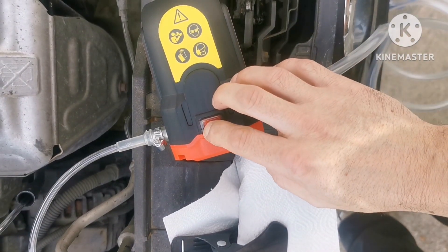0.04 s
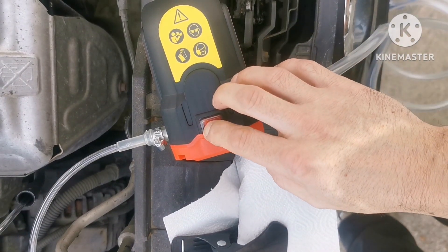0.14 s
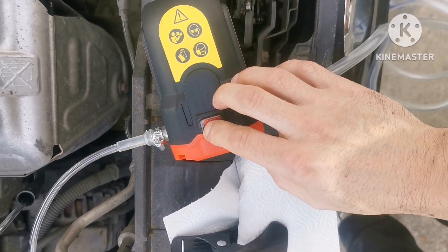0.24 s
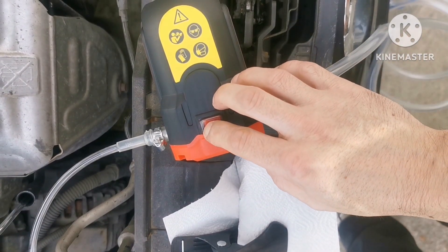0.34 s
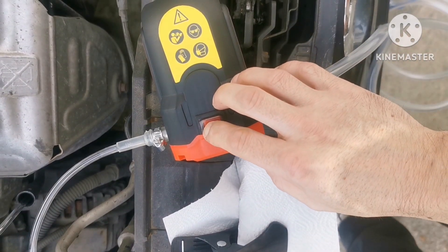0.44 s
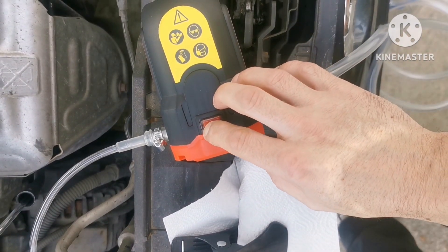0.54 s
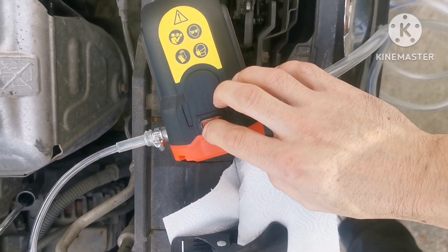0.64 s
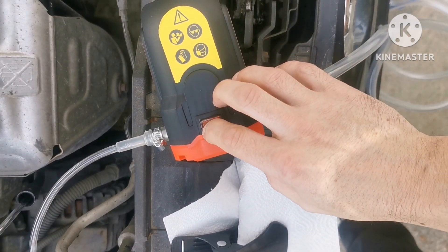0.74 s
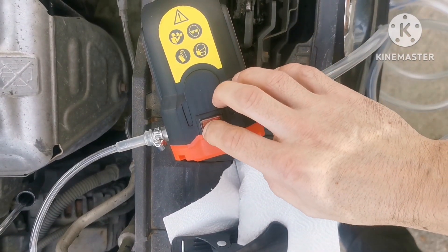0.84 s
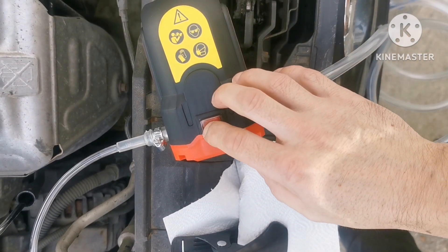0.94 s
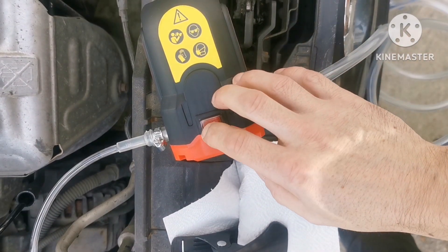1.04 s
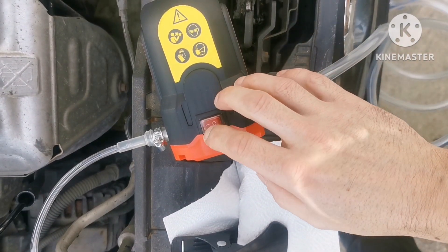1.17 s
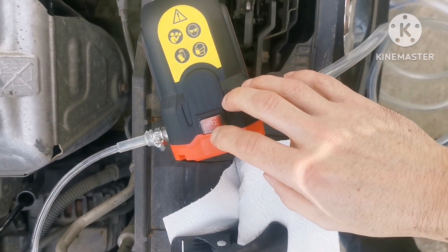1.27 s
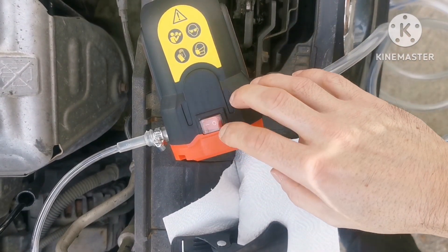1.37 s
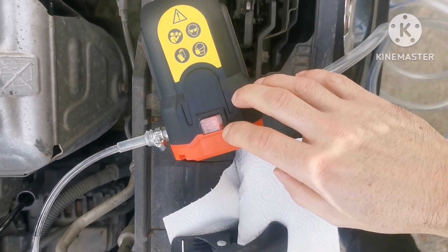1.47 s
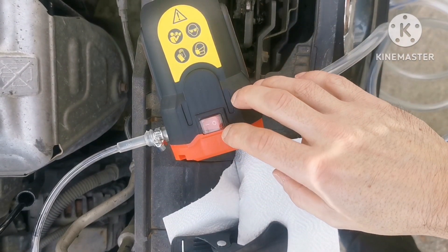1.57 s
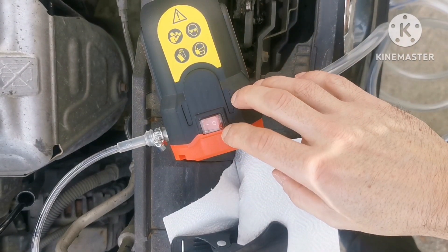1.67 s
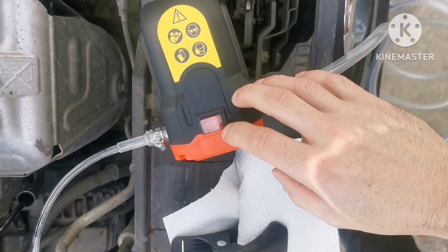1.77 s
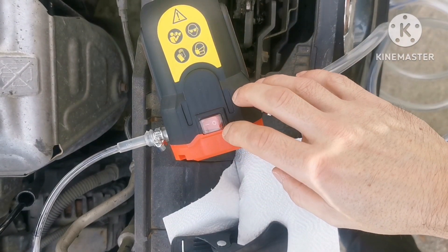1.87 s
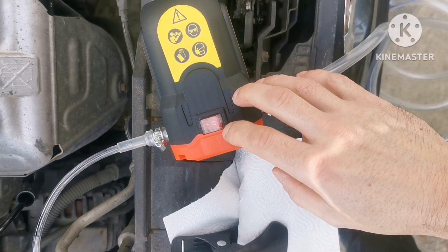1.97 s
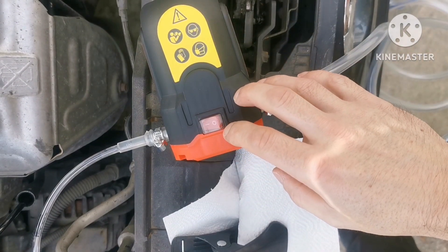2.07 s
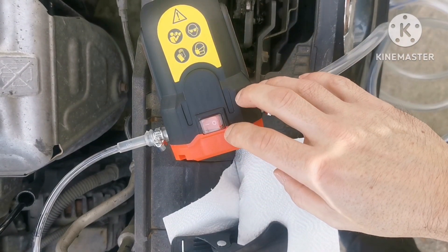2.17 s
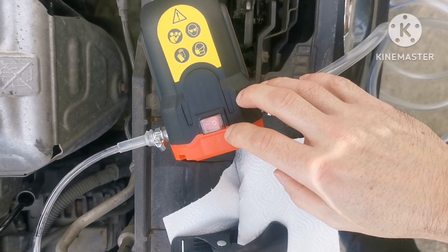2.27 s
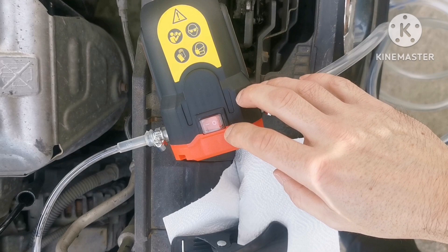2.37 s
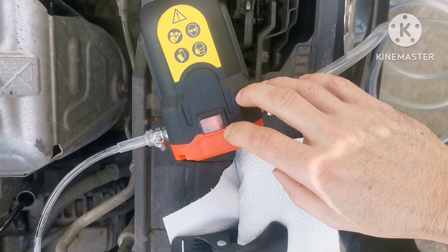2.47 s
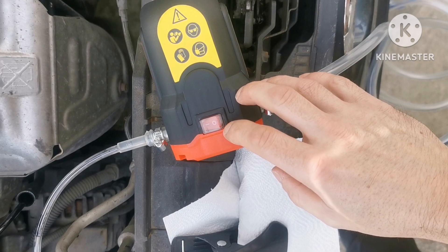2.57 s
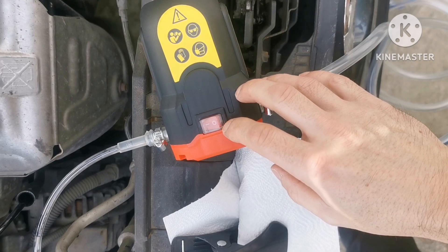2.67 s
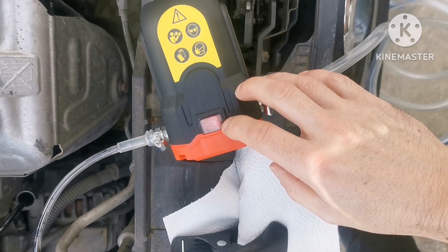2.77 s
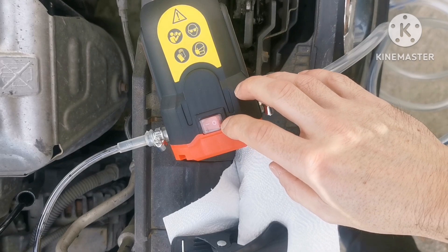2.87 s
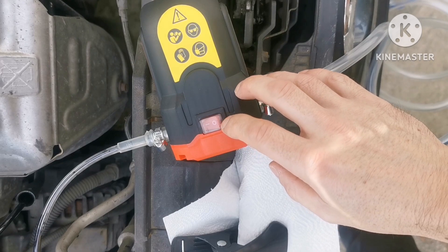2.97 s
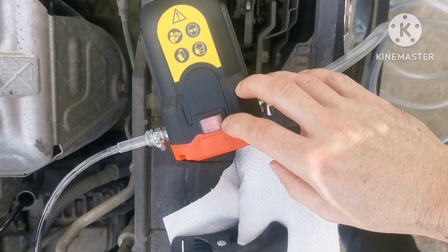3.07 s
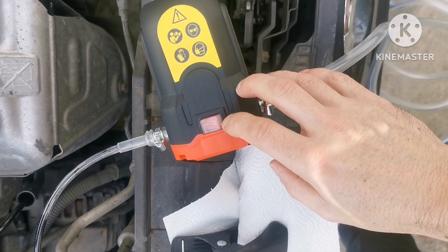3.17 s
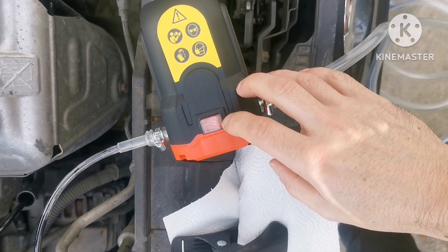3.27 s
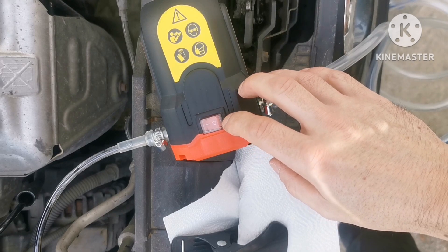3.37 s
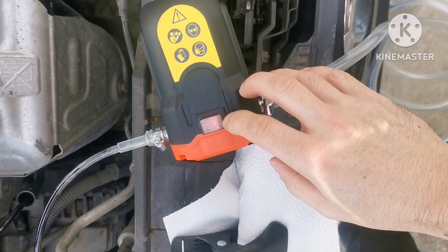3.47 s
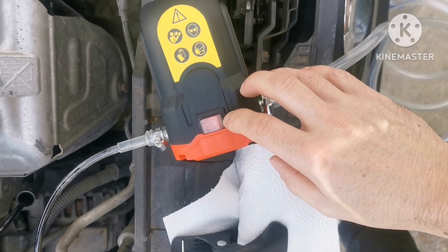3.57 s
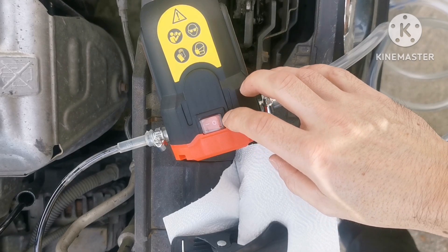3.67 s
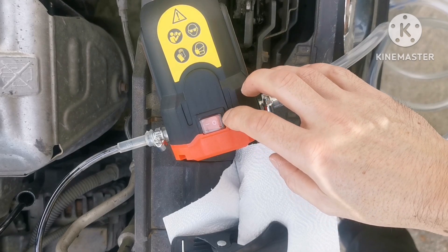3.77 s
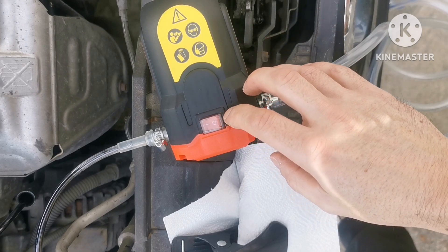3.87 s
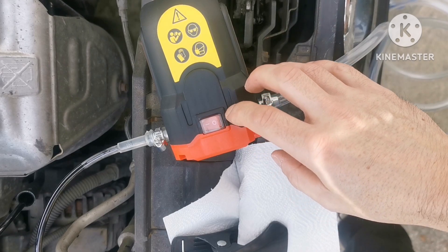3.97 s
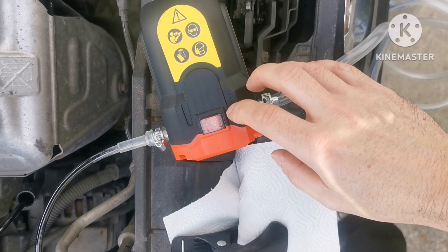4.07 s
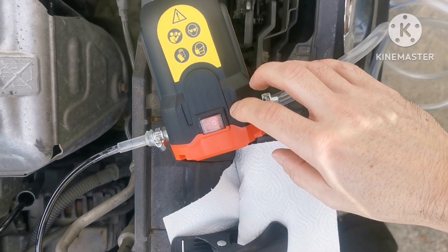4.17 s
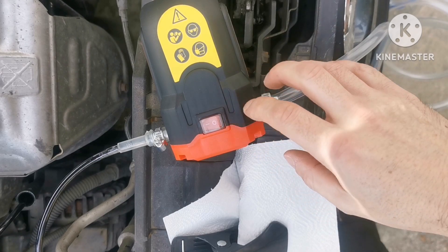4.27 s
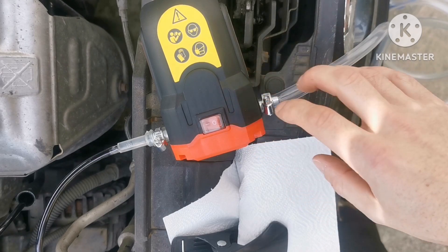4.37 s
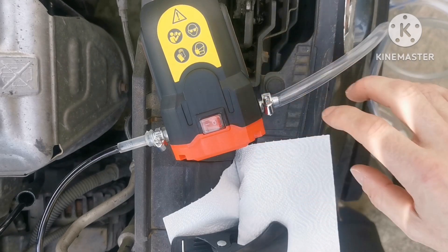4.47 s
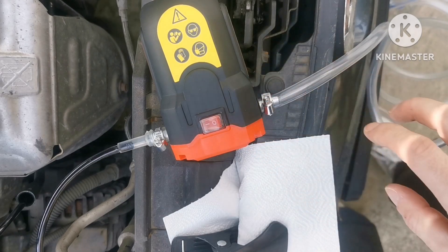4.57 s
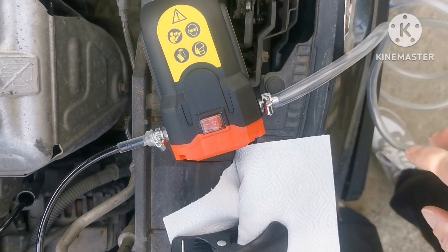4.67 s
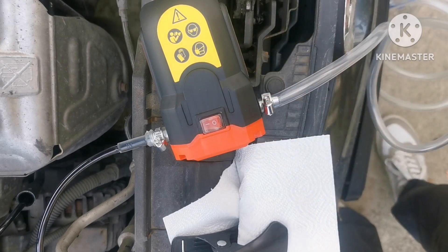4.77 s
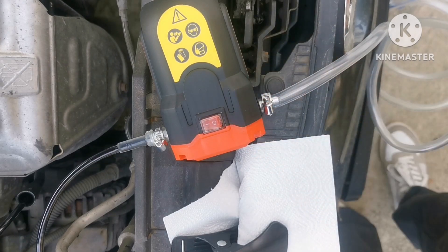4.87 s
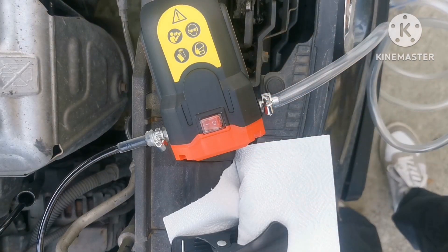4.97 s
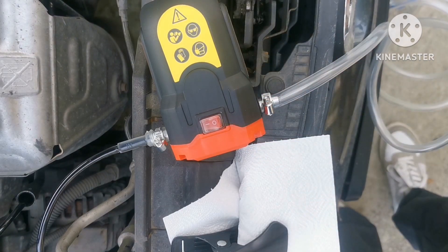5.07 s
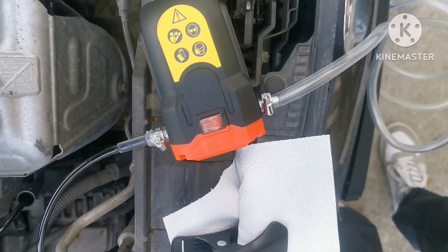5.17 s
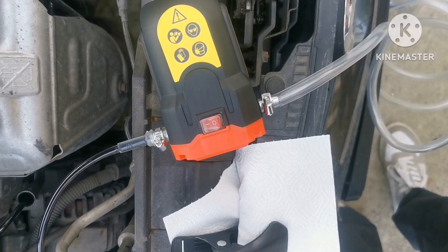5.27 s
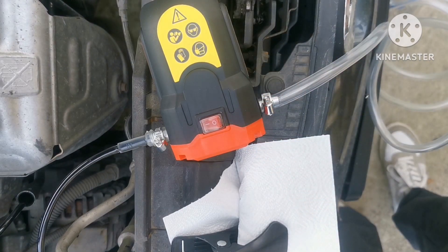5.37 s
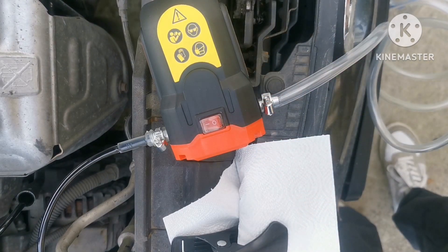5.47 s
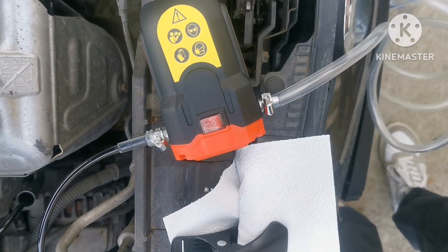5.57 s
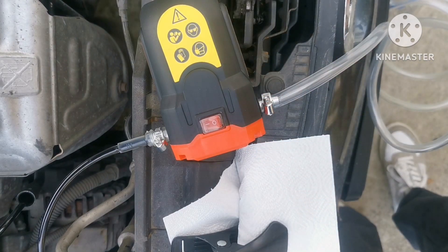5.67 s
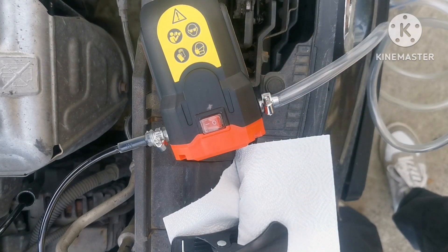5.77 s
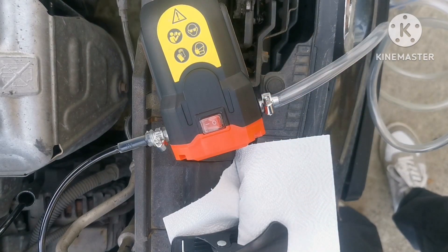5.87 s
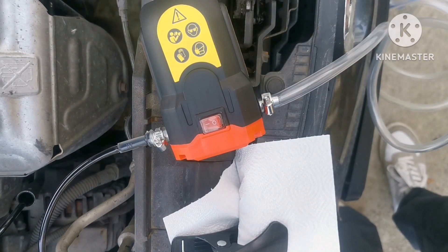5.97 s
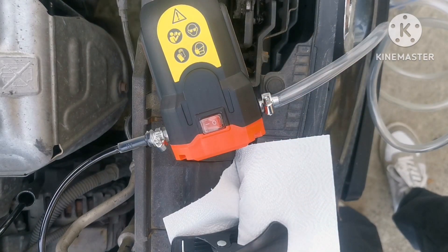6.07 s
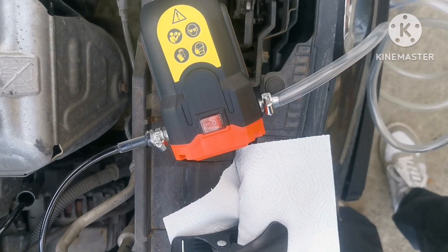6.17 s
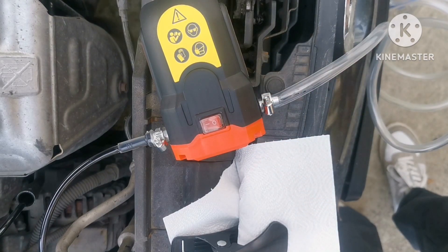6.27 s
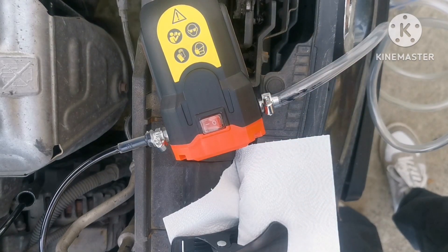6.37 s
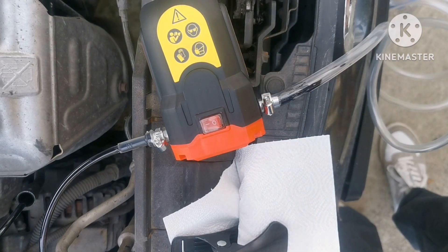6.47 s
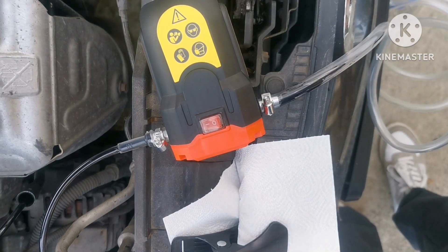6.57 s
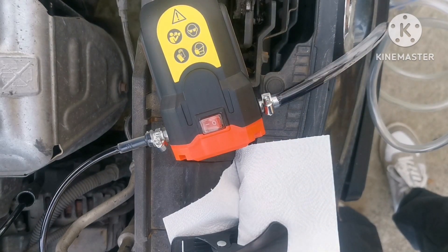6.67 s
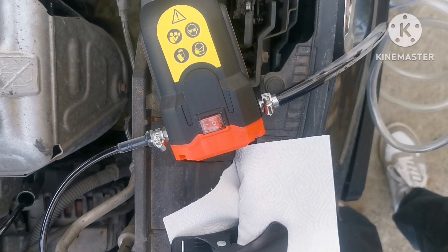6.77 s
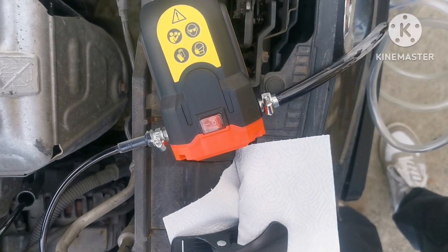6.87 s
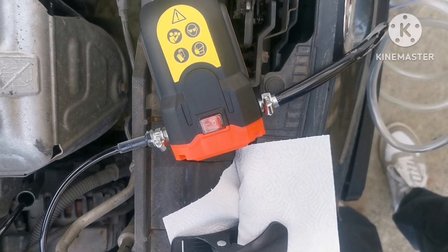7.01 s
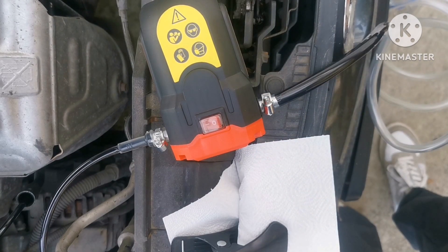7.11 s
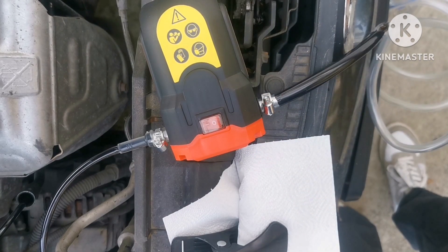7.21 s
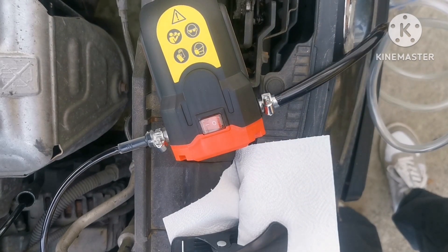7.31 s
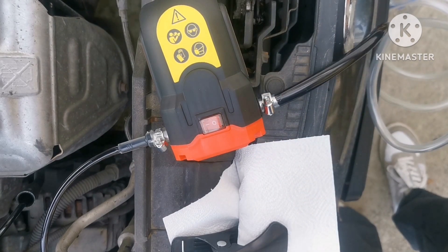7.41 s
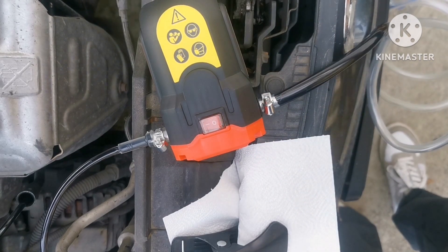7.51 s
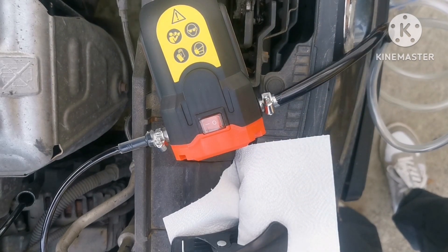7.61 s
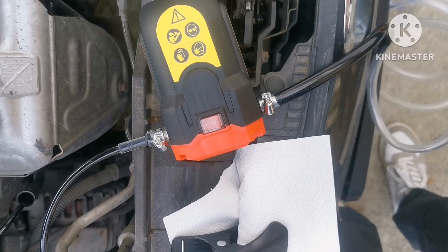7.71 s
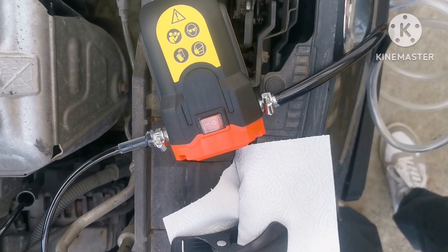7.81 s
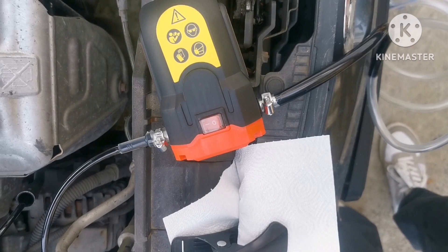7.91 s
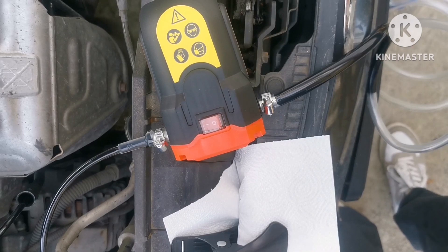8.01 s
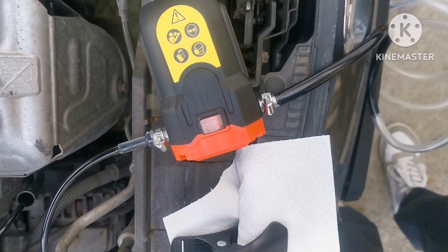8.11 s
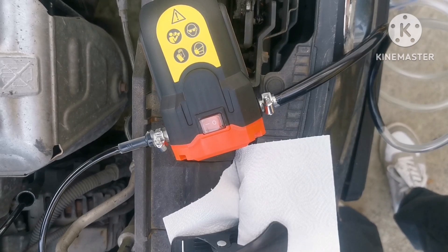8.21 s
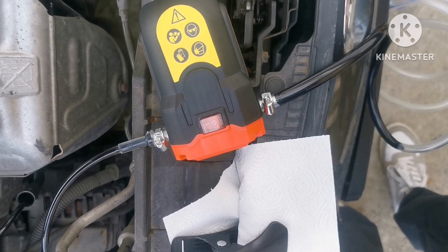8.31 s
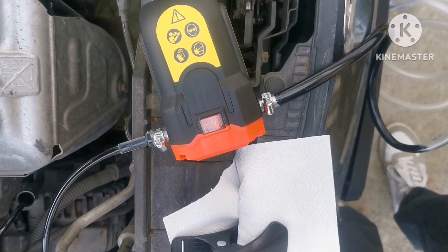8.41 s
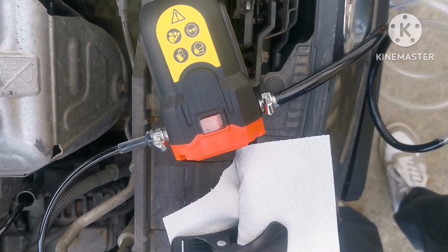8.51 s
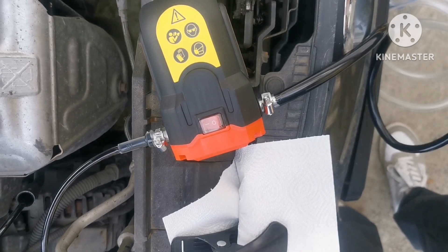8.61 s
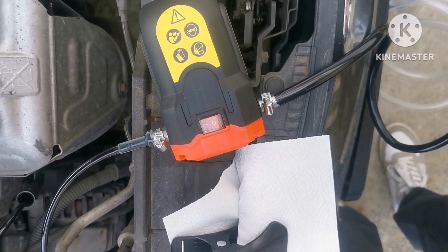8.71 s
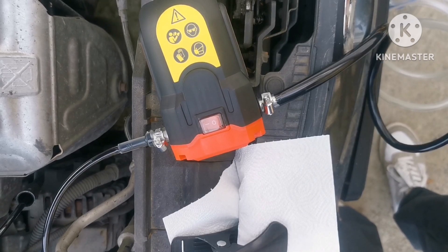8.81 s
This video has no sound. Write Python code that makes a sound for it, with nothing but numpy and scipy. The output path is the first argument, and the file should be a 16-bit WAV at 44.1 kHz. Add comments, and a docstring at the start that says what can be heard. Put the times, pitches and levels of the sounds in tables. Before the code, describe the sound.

A switch snaps, a small geared electric pump whirs up with a high whine and rattle, then oil drags it into a lower pulsing drone.

```python
"""A switch snaps, a gear whine and a rattle start up, and later both are drawn down into a pulsing, oil-laden drone.
A small electric pump lying on a car engine draws oil through a hose; a phone is held above it.
A 12-tooth motor pinion drives a 50-tooth crank wheel: partials locked to the crank angle make hum and whine,
while tooth flaws and noise, coloured by the plastic case, make the rattle. On air the gears run fast;
oil slows the motor and the teeth sing in one burst per crank turn. Quiet garage air and low booms lie beneath."""
import sys
import numpy as np
from scipy import signal
from scipy.fft import rfft, irfft, next_fast_len
from scipy.io import wavfile
from scipy.ndimage import uniform_filter1d, map_coordinates

SR = 44100
rng = np.random.default_rng(int(sys.argv[2]) if len(sys.argv) > 2 else 0)


def waveform_to_disk(signal):
    """Save audio, clipped to [-1, 1], as 16-bit WAV at the path in sys.argv[1]."""
    frames = np.transpose(np.atleast_2d(signal))
    scaled = np.clip(frames, -1, 1) * 32767
    samples = np.round(scaled).astype(np.int16)
    wavfile.write(sys.argv[1], SR, samples)


N = 390285
TIME = np.arange(N) / SR
WHEEL_TEETH, PINION_TEETH = 50, 12
FREE_HZ = 51.36  # crank turns per second of the unloaded motor
OIL_ARRIVES_S = 6.1
SEATING_S = 1.066, 0.022  # moment the teeth seat and time they take, in seconds

# movements of the rocker switch, pressed and then snapping over: start_s, level_db [dB, peak of the ring]
SWITCH_MOVES = [(.694, -48), (.744, -20.5)]
# the oil's uneven drag on the motor: time_s, speed_loss_hz [crank turns per second]
OIL_DRAG = [(6.05, 0.0), (6.15, 0.93), (6.36, 5.3), (6.5, 6.35), (6.56, 5.9), (6.79, 7.65), (6.86, 7.4),
            (6.96, 9.2), (7.45, 8.8), (7.66, 9.25), (7.81, 8.1), (7.89, 8.5), (7.96, 7.7), (8.04, 8.2),
            (8.11, 7.35), (8.17, 7.55), (8.26, 6.9), (8.31, 7.25), (8.44, 6.15), (8.52, 6.5), (8.66, 6.35),
            (8.71, 5.8), (8.76, 6.3), (8.85, 6.45)]
# air pockets passing through the chamber: centre_s, length_s, splutter_db [dB], whine_change_db [dB]
AIR_POCKETS = [(6.386, 0.032, -36, -4), (7.54, 0.094, -34, -4), (7.727, 0.1, -32.5, 1.5)]
SWITCH_ON_S = SWITCH_MOVES[-1][0]


def amp(db):
    """Amplitude ratio: 20 dB is a factor of ten."""
    return 10 ** (np.asarray(db) / 20)


def unit(x):
    """Normalisation to an rms of 1."""
    return x / np.sqrt(np.mean(x ** 2))


def colour(x, points, column=1):
    """Zero-phase spectral filter: (Hz, dB) points joined on a log-frequency axis."""
    points = np.array(points)
    size = next_fast_len(N + 4096, True)
    hz = np.maximum(np.arange(size // 2 + 1) * SR / size, 1)
    gain = amp(np.interp(np.log(hz), np.log(points[:, 0]), points[:, column]))
    return irfft(rfft(x, size) * gain, size)[..., :N]


def walk(rate):
    """Slow random modulation of rms 1, with `rate` new random values a second, smoothed."""
    steps = rng.standard_normal(N // 8)
    joined = np.interp(TIME * rate, np.arange(len(steps)), steps)
    return unit(uniform_filter1d(joined, max(int(SR / rate / 2), 1)))


def curve(table):
    """Piecewise-linear control: (s, value) rows joined by straight lines."""
    return np.interp(TIME, *np.transpose(table))


def since(s):
    """Elapsed time in seconds from a moment, zero before it."""
    return np.maximum(TIME - s, 0)


def bump(s, width_s):
    """Gaussian bell of height 1 round a moment."""
    return np.exp(-((TIME - s) / width_s) ** 2)


def surface(turns, count):
    """Periodic excitation: random flaws round a wheel, met again on every turn."""
    flaws = rng.standard_normal(count)
    return unit(np.interp(turns % 1, np.arange(count) / count, flaws, period=1))


def stroke(turns, lean=0.12):
    """Cyclic pressure over one crank turn, -1 to 1: it builds fast and lets go slowly."""
    angle = 2 * np.pi * turns
    return np.cos(angle + lean * np.cos(angle))


def tone(turns, order):
    """Order-locked partial of rms 1; wheel and pinion line up again every six turns, so orders are sixths."""
    order = np.round(order * 6) / 6
    return np.sin(2 * np.pi * (order * turns + rng.random())) * np.sqrt(2)


def ports(x, lag_ms=0.1):
    """Time difference of arrival: the sound reaches the left microphone slightly before the right."""
    delayed = map_coordinates(x, [np.arange(N) - lag_ms * SR / 1000], order=3)
    return np.array([x, delayed])


def sides(pair):
    """Level difference by frequency: most bands are somewhat louder at the right microphone."""
    # the microphone pair: frequency_hz, left_minus_right_db
    level_difference = [(60, -6), (200, -8), (400, 0), (700, -2), (1300, -2.5), (2300, -2.5), (4400, 0),
                        (8000, -3), (15000, -5.5)]
    left = colour(pair[0], [(hz, db / 2) for hz, db in level_difference])
    right = colour(pair[1], [(hz, -db / 2) for hz, db in level_difference])
    return np.array([left, right])


def pump(rattle_db=-1, overtones_db=0, attack_s=0.032, rattle_power=0.95):
    """Rotating machine: crank speed and oil load govern hum, whine and rattle from the switch-on onward."""
    # the whine's fundamental shifts between the ears: time_s, left_minus_right_db
    fundamental_pan = [(6.2, -1), (6.71, -5.5), (6.82, -3.5), (7.0, -9.5), (8.01, -0.5), (8.28, -7.5),
                       (8.85, -7)]
    jolt_db, jolt_s = 13, 0.14  # the first jolt brings out octave and overtones, then decays
    fill_s, oil_share = 0.12, 0.97  # filling time constant and final share of oil (0-1)
    rest_angle = 0.75  # crank turns
    # an upper tone stands out briefly as the hand lifts away
    uncovered_order, uncovered_s, uncovered_width_s, uncovered_db = 88, 4.54, 0.09, -44

    since_on = since(SWITCH_ON_S)
    speed_hz = crank_speed(since_on)
    oil = oil_share * (1 - np.exp(-since(OIL_ARRIVES_S) / fill_s))
    running = 1 - np.exp(-since_on / attack_s)
    turns = rest_angle + np.cumsum(speed_hz) / SR + .0008 * walk(18)

    # hum and rattle need speed, so the bare whine leads the spin-up
    up_to_speed = np.clip((speed_hz + curve(OIL_DRAG)) / FREE_HZ, 0, 1)
    motor_onset = 1 - np.exp(-since_on / 0.099)
    drone = up_to_speed ** 4 * (hum(turns, oil) + motor_onset * motor(turns, speed_hz))
    sidebands = ports(up_to_speed ** 6 * wobble(turns, oil), lag_ms=0.08)

    whine_gain = np.sqrt(running) * amp(tooth_pressure(since_on, oil))
    fundamental, octave, *overtones = whine_gain * whine(turns, oil)
    beamed = ports(fundamental) * amp(np.outer([1, -1], curve(fundamental_pan) / 2))
    bright = amp(overtones_db + jolt_db * np.exp(-since_on / jolt_s))
    gritty = unit(amp(5 * walk(1100)))
    # the octave drops away while the first air pocket passes
    octave = octave * amp(-11 * bump(AIR_POCKETS[0][0], .045))
    uncovered = amp(uncovered_db) * bump(uncovered_s, uncovered_width_s) * tone(turns, uncovered_order)

    # the engine bay scrambles the knocks differently for each microphone
    scattered = np.array([rattle(turns, oil), rattle(turns, oil)])
    knocks = up_to_speed ** rattle_power * amp(rattle_db) * bay(rattle(turns, oil), scattered)
    body = ports(drone + case_ring(turns, oil) + oil * gurgle())
    # the overtones arrive with a slightly longer lag between the microphones
    body = body + ports(bright * gritty * sum(overtones), lag_ms=0.11)
    body = body + running * octave_ring(bright * octave)
    return beamed + sides(body + sidebands + uncovered + knocks)


def crank_speed(since_on):
    """Torque balance: the motor spins up, creeps to its free speed as friction eases, and oil drag slows it."""
    # friction that wears off after the start: speed_loss_hz [crank turns per second], time_constant_s
    friction_terms = [(7.93, 0.102), (2.05, 1.97)]
    spin_up_s = 0.023
    friction = sum(lost * np.exp(-since_on / s) for lost, s in friction_terms)
    spin_up = 1 - np.exp(-(since_on / spin_up_s) ** 1.5)
    return (FREE_HZ - friction) * spin_up - curve(OIL_DRAG)


def whine(turns, oil, air_swing_db=-1.5, oil_swing_db=6.5, start_stumble=0.2, uneven_db=1., octave_grip=0.79):
    """Gear-mesh harmonics: cyclic load modulates their level and phase once a turn; one row per partial."""
    # partials of the tooth contact: order [multiple of the tooth rate], air_db, oil_db [relative dB]
    tooth_partials = [(1, 0, 0), (2, -7.5, -11), (3, -33, -23.5), (4, -36, -25), (5, -36, -20.5),
                      (6, -38, -29)]
    swing_db = air_swing_db + (oil_swing_db - air_swing_db) * grip(oil)
    force = amp(swing_db * stroke(turns) + uneven_db * walk(60))
    force /= np.sqrt(uniform_filter1d(force ** 2, SR // 4))  # the swing leaves the average power alone

    # phase deviations, scaled for each partial below
    chatter = .034 * walk(700)
    slip = .045 * walk(170)
    sag = .06 * oil * np.cos(2 * np.pi * turns)
    # the crank stumbles until the teeth seat, and again while air and oil are still mixed
    stumble = start_stumble * (1 - seating()) + 1.1 * oil * (1 - oil)
    unsteady = (slip + chatter) * (1 + oil) / 2 + sag - stumble * np.sin(2 * np.pi * turns)

    # the octave is steadier in pitch, scrapes a little and swings less between the strokes
    roughness = .25 + .8 * (1 - seating())
    scrape = force ** octave_grip * (1 + roughness * walk(500))
    partials = []
    for order, air_db, oil_db in tooth_partials:
        if order == 2:
            partial = scrape * tone(WHEEL_TEETH * turns + .45 * unsteady, order)
        else:
            partial = force * tone(WHEEL_TEETH * turns + unsteady, order)
        partials.append(amp(air_db + (oil_db - air_db) * oil) * partial)
    return np.array(partials)


def tooth_pressure(since_on, oil):
    """Contact load sets the whine's level in dB: teeth seat and work loose on air, and oil presses them hard."""
    slack_db, seated_db, pressed_db = -47, -25.3, -19
    start_db, start_s = 17.5, 0.55  # the starting torque presses the teeth too, decaying
    sag_lengths = 4.1  # width of the level change, in pocket lengths
    seat_at_s, _ = SEATING_S
    seated = seating() * bump(seat_at_s, 3.7)  # slowly works loose
    start_push_db = (1 - seating()) * start_db * np.exp(-since_on / start_s)
    air_db = slack_db + (seated_db - slack_db) * seated + start_push_db
    pocket_db = sum(change_db * bump(s, sag_lengths * length) for s, length, _, change_db in AIR_POCKETS)
    return air_db + (pressed_db - air_db) * grip(oil) + pocket_db


def seating():
    """Contact transition: 0 while the teeth still bounce after the start, 1 once they have seated."""
    seat_at_s, seat_s = SEATING_S
    return (1 + np.tanh((TIME - seat_at_s) / seat_s)) / 2


def grip(oil):
    """Saturating load (0-1): the first oil in the chamber already puts the teeth under nearly full load."""
    return 1 - (1 - oil) ** 2.2


def octave_ring(octave, lag_ms=0.082):
    """Resonant transmission: the octave swells and fades at each microphone as its pitch crosses resonances."""
    # resonances of case and engine bay: frequency_hz, left_db, right_db
    octave_resonances = [(3000, 0, 0), (4220, -1, -2), (4330, 5, 0), (4420, 2, 1), (4490, 2, 4.5),
                         (4610, 7, 7), (4700, 5, 5), (4850, 3, 6), (5000, -1, 3), (5150, -10, -9)]
    left, right = ports(octave, lag_ms)
    return np.array([colour(left, octave_resonances, column=1), colour(right, octave_resonances, column=2)])


def wobble(turns, oil, air_db=-0.5, oil_db=0, waver_db=1.5):
    """Modulation sidebands: wheels slightly out of true set tones beside the whine; oil stills most of them."""
    # tones beside the whine and its octave on air: order [multiple of the crank rate], level_db [relative dB]
    light_tones = [(39, -47), (40.83, -44), (43, -43), (44.83, -48), (45.83, -43.5), (46, -45), (47, -41),
                   (49, -36.5), (52, -39), (53, -44.5), (53.17, -44.5), (54, -44), (54.17, -41), (59, -47),
                   (87.83, -52), (92, -49), (93, -47), (95, -47), (96, -46), (99, -41), (101, -46),
                   (104, -45), (106, -47)]
    # tones beside the whine once oil loads the wheel: order [multiple of the crank rate], level_db [relative dB]
    loaded_tones = [(47, -45), (53, -40.5)]
    light = sum(amp(db) * tone(turns, order) for order, db in light_tones)
    loaded = sum(amp(db) * tone(turns, order) for order, db in loaded_tones)
    return amp(waver_db * walk(25)) * (amp(air_db) * (1 - oil) * light + amp(oil_db) * oil * loaded)


def rattle(turns, oil, air_swing_db=-0.5, oil_swing_db=0.0, valve_db=4, valve_length=0.0064, beat_db=0.8):
    """Cyclic and random impacts: tooth flaws repeat, backlash knocks at random, a valve slaps once a turn."""
    # colour of the rattling case: frequency_hz, air_db, oil_db [relative dB]
    case_colour = [(15, -60, -49), (60, -47, -24), (104, -29.5, -25.5), (320, -24, -29.5),
                   (490, -24, -26.5), (770, -15, -13.5), (889, -20, -26), (952, -17.5, -19),
                   (1930, -20, -22), (2080, -12.5, -15), (2910, -19, -27), (3510, -25.5, -29),
                   (4280, -22.5, -25), (4390, -18.5, -19), (5220, -18, -23.5), (5870, -31.5, -33.5),
                   (10700, -30, -31.5), (13800, -34, -36)]
    pinion = turns * WHEEL_TEETH / PINION_TEETH
    # the same teeth meet again every six turns; oil presses the wheel's own flaws forward and churns at random
    pairs = amp(-7.5 - 3 * oil) * surface(turns / 6, count=4096)
    wheel_flaws = amp(-17.5 + 3 * oil) * surface(turns, count=256)
    pinion_flaws = amp(-21) * surface(pinion, count=64)
    loose = colour(rng.standard_normal(N), [(1400, -14), (5000, -9), (9000, -5)])
    churn = oil * colour(rng.standard_normal(N), [(1400, -4), (5000, -10)])
    impacts = pairs + wheel_flaws + pinion_flaws + loose + churn
    knocks = impacts * amp(1.8 * surface(turns / 6, count=360))

    swing_db = air_swing_db + (oil_swing_db - air_swing_db) * oil
    valve = np.exp(-((turns + 0.07) % 1) / valve_length)  # length in turns
    # the six-turn round flutters while the gears run light
    beat = (1 - oil) * np.cos(2 * np.pi * turns / 6)
    knocks = unit(knocks * amp(swing_db * stroke(turns) + valve_db * valve + beat_db * beat))
    return colour(knocks * (1 - oil), case_colour, column=1) + colour(knocks * oil, case_colour, column=2)


def bay(direct, scattered):
    """Diffuse scattering: direct sound and the scatter off the engine parts, mixed at equal total power."""
    # echoes from the engine bay against the direct sound: frequency_hz, scatter_db
    bay_echoes = [(150, 19.5), (600, 4), (1300, -9.5), (2400, -0.5), (4500, 0.5), (9000, 27)]
    equal_power = [(hz, -10 * np.log10(1 + amp(2 * db))) for hz, db in bay_echoes]
    return colour(ports(direct) + colour(scattered, bay_echoes), equal_power)


def hum(turns, oil, waver_db=1.5, hum_db=-3.44, strain_db=7, strain_s=0.31):
    """Forced vibration: crank, valves and pinion shake the case, low tones hardest as the motor strains to start."""
    # hum tones: order [multiple of the crank rate], start_db, suction_db, oil_db [relative dB]
    hum_tones = [(3, -43, -49, -39), (4, -46, -38.5, -50), (4.17, -44, -44, -50), (6, -50, -58, -41),
                 (7, -58, -47, -62), (8, -51, -54, -53), (10, -47, -62, -57), (11, -49, -49, -60),
                 (14, -46, -47, -52), (15, -47, -41, -40), (18, -60, -56, -43), (19, -44, -50, -50),
                 (19.17, -54, -43, -62), (19.33, -49, -44, -60), (20, -45, -50, -48), (23, -45, -50, -51),
                 (24.17, -52, -46, -56), (24, -54, -41, -49), (25, -41, -49, -51), (27, -55, -55, -42),
                 (27.67, -51, -46, -60), (38, -54, -54, -45)]
    suction = np.interp(TIME, [SWITCH_ON_S, OIL_ARRIVES_S], [0, 1])
    dip_db = -11 * bump(6.97, 0.3)  # the low tones dip briefly
    low_db = dip_db + strain_db * np.exp(-since(SWITCH_ON_S) / strain_s)
    out = 0
    for order, start_db, suction_db, oil_db in hum_tones:
        air_db = start_db + (suction_db - start_db) * suction
        level_db = air_db + (oil_db - air_db) * oil + low_db * (order < 7)
        out = out + amp(level_db) * tone(turns, order)
    return amp(hum_db + waver_db * walk(12)) * out


def motor(turns, speed_hz, waver_db=0.5):
    """Swept resonance: three-pole cogging, three per pinion turn, and the crank's ninth multiple swell in the case."""
    # case resonances met by the motor's tone: frequency_hz, level_db
    motor_resonances = [(450, -45), (530, -45), (550, -37.5), (565, -33.5), (600, -33), (625, -43.5),
                        (640, -39)]
    # case resonances met by the crank's ninth multiple: frequency_hz, level_db
    crank_resonances = [(400, -48.5), (428, -49), (441, -36.5), (452, -33.5), (460, -38.5)]
    out = 0
    for order, ring in [(3 * WHEEL_TEETH / PINION_TEETH, motor_resonances), (9, crank_resonances)]:
        level_db = np.interp(order * speed_hz, *np.transpose(ring))
        out = out + amp(level_db + waver_db * walk(7.3)) * tone(turns, order)
    return out


def case_ring(turns, oil, ring_hz=2130, width_hz=260, ring_db=-38, swing_db=9, surge_db=15, start_db=-31):
    """Noise-driven resonance: strokes ring the case, most before the teeth seat and in the first surge of oil."""
    knocks = rng.standard_normal(N) * amp(swing_db * stroke(turns))
    peak = [(20, -90), (ring_hz - width_hz, -24), (ring_hz, 0), (ring_hz + width_hz, -24), (SR / 2, -90)]
    ring = unit(colour(knocks, peak))
    bouncing = np.clip(turns - 1, 0, 1) * (1 - seating())
    surge = 4 * oil * (1 - oil)  # peaks at 1 when the chamber is half full
    return (amp(ring_db + surge_db * surge) * oil + amp(start_db) * bouncing) * ring


def gurgle(lumpy_db=3, clear_s=0.02):
    """Two-phase flow noise: each air pocket splutters unevenly, swelling until it clears the chamber."""
    splutter = rng.standard_normal(N) * amp(lumpy_db * walk(200))
    pockets = 0
    for s, length_s, splutter_db, _ in AIR_POCKETS:
        pockets = pockets + amp(splutter_db) * bump(s, np.where(TIME < s, length_s, clear_s))
    bubbling = [(100, -17), (350, 6), (700, 9), (1200, 13), (2200, -29), (5000, -45)]
    return pockets * unit(colour(splutter, bubbling))


def switch():
    """Impulse response of damped modes: each movement of the rocker rings its plastic seat."""
    # the seat's modes: frequency_hz, level_db [relative dB], t60_s
    seat_modes = [(790, -11, 0.019), (1050, 7.5, 0.032), (2150, 2, 0.012)]
    out = np.zeros(N)
    for s, level_db in SWITCH_MOVES:
        t = since(s)
        ring = 0
        for hz, mode_db, t60_s in seat_modes:
            decay = np.exp(-np.log(1000) * t / t60_s)
            ring = ring + amp(mode_db) * decay * np.sin(2 * np.pi * hz * t)
        out += amp(level_db) * ring / np.abs(ring).max()
    return ports(out)


def background(apart=0.65):
    """Partly coherent ambient noise: quiet garage air, low booms and a growing rumble."""
    # spectrum of the garage air: frequency_hz, density_db [relative dB per Hz]
    garage_colour = [(15, -37), (25, -17), (69, -1), (88, -34), (191, -33), (264, -23), (383, -25.5),
                     (7890, -52), (15000, -43)]
    # low booms that swell and fade: peak_s, level_db, decay_s
    boom_swells = [(0.95, -88, 0.22), (4.4, -44, 1.0), (7.2, -41, 0.27)]
    garage_db, boom_floor_db, boom_attack_s = -61, -60, 0.077

    def shaped_noise(points):
        """Partial coherence: a shared noise plus a separate one for each side, at rms 1."""
        return unit(colour(rng.standard_normal(N) + apart * rng.standard_normal((2, N)), points))

    boom = shaped_noise([(30, -42), (68, -20), (80, 10), (92, -9), (170, -11.5), (600, -84)])
    rumble = shaped_noise([(10, -15), (25, -10), (50, -6), (110, -19), (600, -82)])
    swells = 0
    for s, level_db, decay_s in boom_swells:
        envelope = np.where(TIME < s, bump(s, boom_attack_s), np.exp(-since(s) / decay_s))
        swells = swells + amp(level_db) * envelope
    rumble_db = -60 + 2.5 * since(2.6)  # grows by 2.5 dB per second from 2.6 s on
    air = amp(garage_db) * shaped_noise(garage_colour)
    return (amp(boom_floor_db) + swells) * boom + amp(rumble_db) * rumble + air


def scene():
    """Superposition of pump and switch over the quiet garage."""
    return pump() + sides(switch()) + background()


def record(dry):
    """Band limiting: the phone cuts the top with a steep elliptic low-pass at 15950 Hz."""
    return signal.sosfilt(signal.ellip(12, .2, 80, 15950, fs=SR, output="sos"), dry)


dry = scene()
out = record(dry)
waveform_to_disk(out)
```